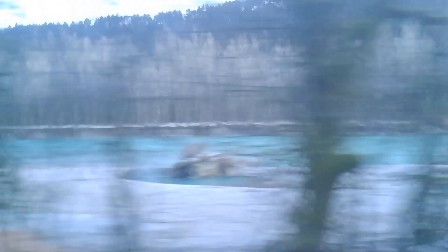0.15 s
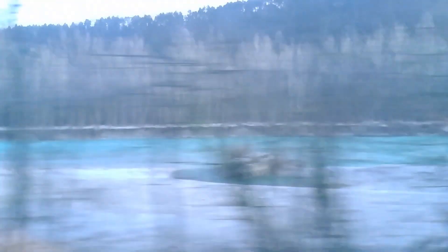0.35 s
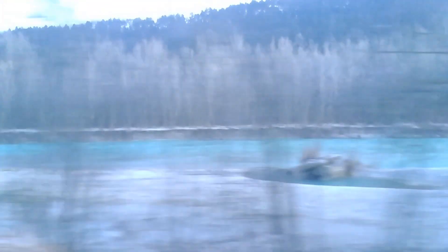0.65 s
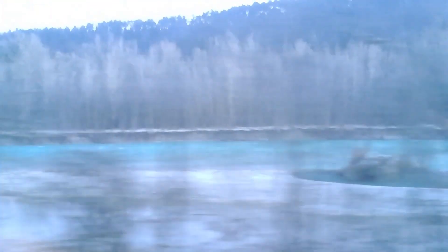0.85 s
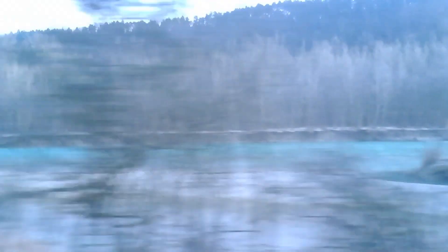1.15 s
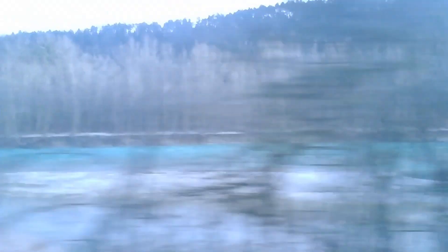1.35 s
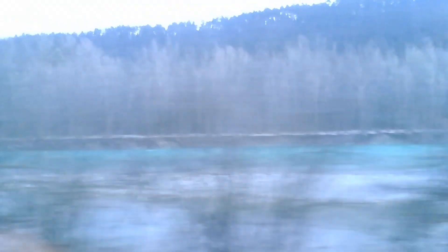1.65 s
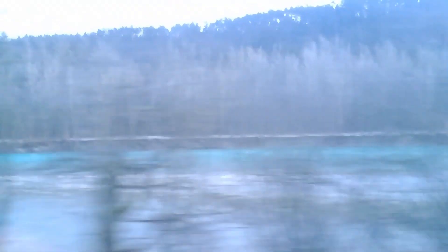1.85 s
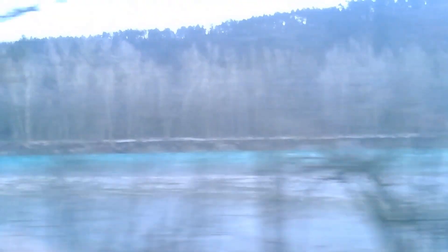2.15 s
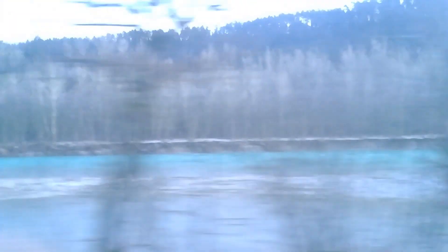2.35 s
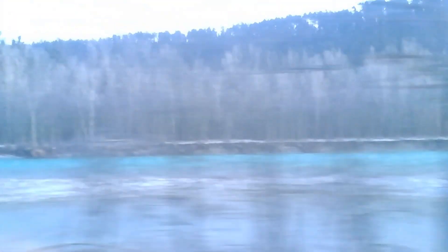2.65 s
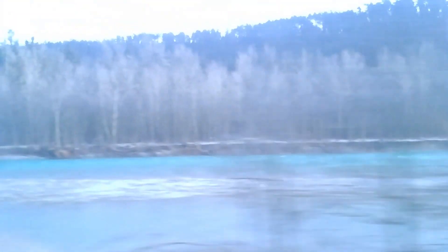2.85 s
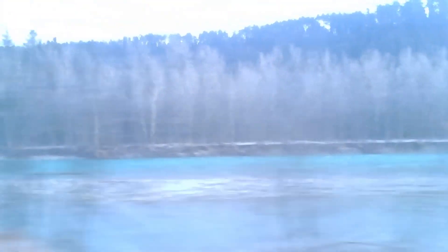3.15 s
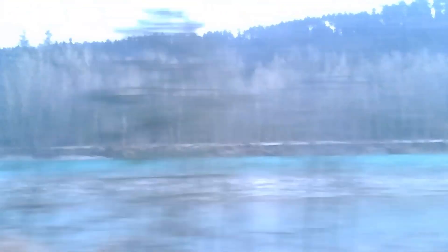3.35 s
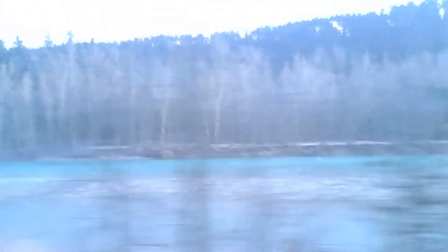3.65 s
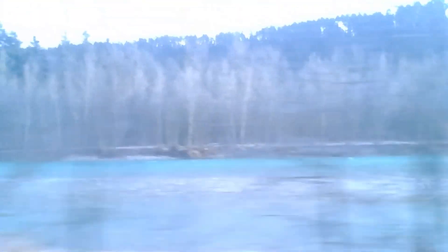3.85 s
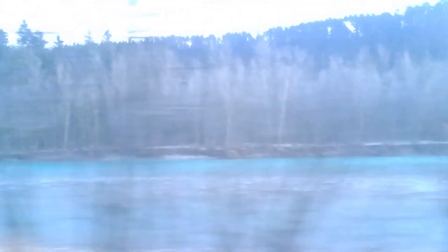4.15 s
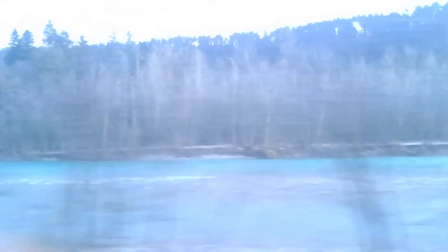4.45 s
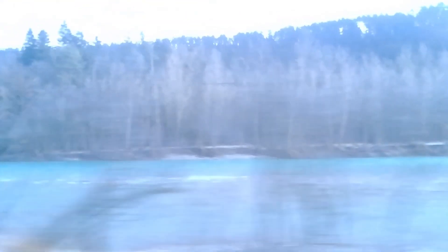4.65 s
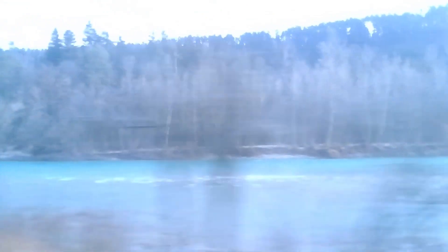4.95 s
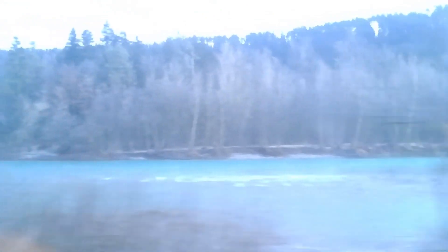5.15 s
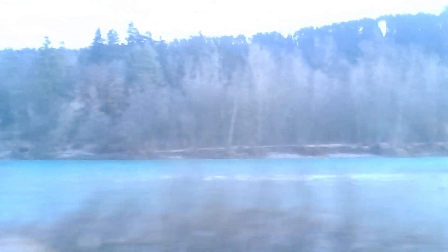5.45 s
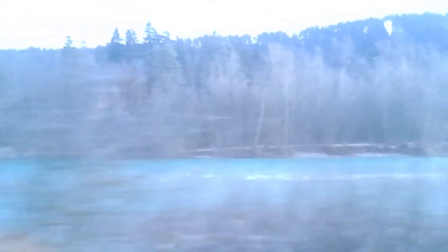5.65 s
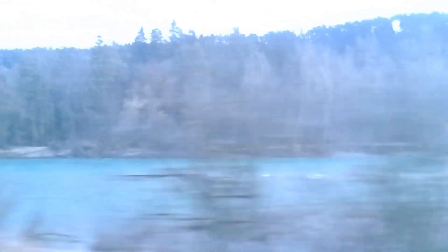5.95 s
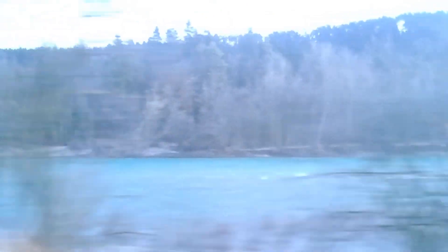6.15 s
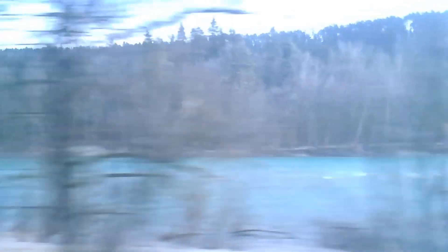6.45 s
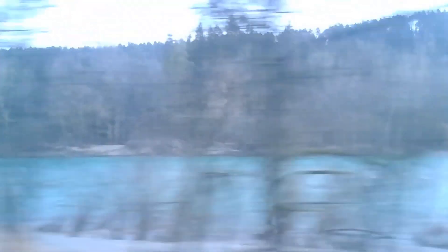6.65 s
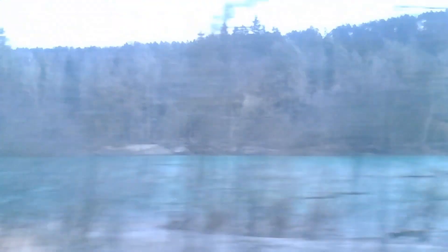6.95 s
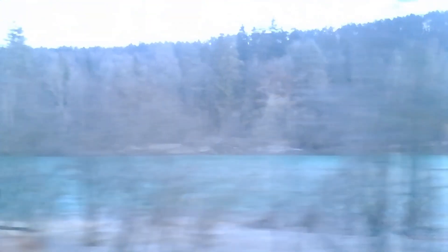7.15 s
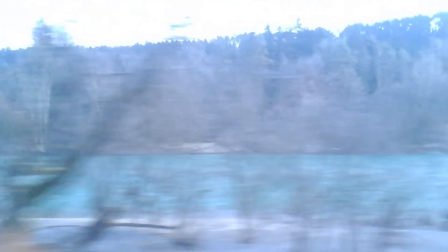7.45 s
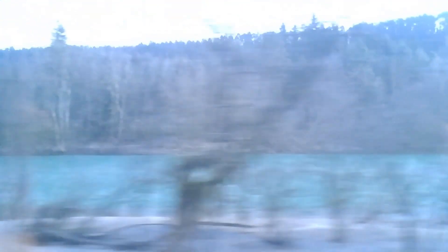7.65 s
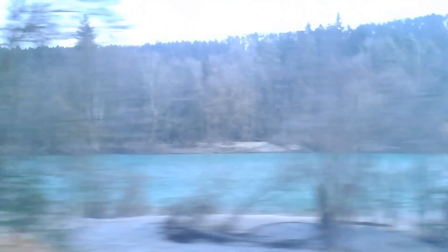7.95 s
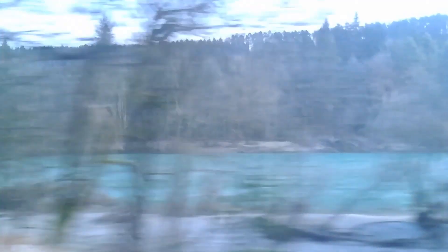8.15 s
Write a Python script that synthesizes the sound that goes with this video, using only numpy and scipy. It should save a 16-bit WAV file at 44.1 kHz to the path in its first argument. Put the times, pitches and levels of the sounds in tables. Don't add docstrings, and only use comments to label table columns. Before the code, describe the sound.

Low throbbing hum and rail rumble fill a moving railway carriage; the boom fades midway, leaving rushing roar and small rattles.

```python
import sys
import numpy as np
from scipy import signal
from scipy.fft import rfft, irfft
from scipy.io import wavfile
from scipy.ndimage import uniform_filter1d, minimum_filter1d

SR = 44100
rng = np.random.default_rng(int(sys.argv[2]) if len(sys.argv) > 2 else 0)


def inscribe(sig):
    pcm = np.round(np.clip(np.atleast_2d(sig).T, -1, 1) * 32767)
    wavfile.write(sys.argv[1], SR, pcm.astype(np.int16))


def nominal_scale(level):
    x = np.asarray(level, float) / 20
    return 10 ** x


N = 365148

# start_s, turns_per_s
AXLE_SPEED = [(0, 12.9), (.5, 13.23), (.9, 13.22), (1.1, 13.0), (1.7, 13.06), (2.1, 13.02), (2.3, 13.15),
              (2.55, 13.03), (2.9, 12.87), (3.9, 12.9), (4.5, 12.72), (5.1, 12.64), (5.5, 12.44),
              (6.3, 12.4), (7, 12.21), (7.5, 12.2), (7.9, 12.11), (8.3, 11.93)]


def rms_one(x):
    return x / np.sqrt(np.mean(x ** 2) + 1e-20)


def in_time(rows):
    s, *columns = np.transpose(rows)
    return [np.interp(np.arange(N) / SR, s, c) for c in columns]


def at_hz(points, hz):
    knots_hz, *columns = np.transpose(points)
    return [np.interp(np.log(hz), np.log(knots_hz), c) for c in columns]


def drift(rate_hz):
    step = 40
    settle = 2000
    r = np.exp(-2 * np.pi * rate_hz * step / SR)
    draws = rng.standard_normal(N // step + settle + 2)
    slow = signal.lfilter([1], [1, -2 * r, r * r], draws)[settle:]
    return np.interp(np.arange(N) / step, np.arange(len(slow)), rms_one(slow - slow.mean()))


def bell(at_s, spread_s):
    return np.exp(-.5 * ((np.arange(N) / SR - at_s) / spread_s) ** 2)


def beat(db, depth_db, period_s, loudest_s):
    return db + depth_db * np.cos(2 * np.pi * (np.arange(N) / SR - loudest_s) / period_s)


def bandpass(x, order, low_hz, high_hz):
    return signal.sosfilt(signal.butter(order, [low_hz, high_hz], "band", fs=SR, output="sos"), x)


def tone(hz):
    cycles = np.cumsum(hz * np.ones(N)) / SR + rng.random()
    return np.sqrt(2) * np.sin(2 * np.pi * cycles)


def ring(clicks, hz, t60_s):
    r = nominal_scale(-60 / (t60_s * SR))
    w = 2 * np.pi * hz / SR
    return signal.lfilter([0, np.sin(w)], [1, -2 * r * np.cos(w), r * r], clicks + 1e-18)


def struck(s, db, pan_db, modes):
    spread_db = 2.2 * rng.standard_normal((len(s), len(modes)))
    out = np.zeros((2, N))
    for k, (hz, mode_db, t60_s) in enumerate(modes):
        clicks = np.zeros((2, N))
        clicks[:, (s * SR).astype(int)] = nominal_scale(db + mode_db + spread_db[:, k] + [pan_db / 2, -pan_db / 2])
        out += ring(clicks, hz, t60_s)
    return out


def diffuse(spectrum):
    # freq_hz, likeness_0_to_1, right_lead_rad, left_minus_right_db
    ports = [(65, .99, -.18, -.5), (130, .985, -.1, 0), (170, .985, 0, 1), (220, .8, .1, -.8),
             (340, .76, 0, 1.3), (430, .52, -.1, 1.8), (600, .46, .4, -.7), (950, .28, 1.3, 0),
             (1400, .22, 2.5, -2), (2000, .1, 4.9, -.4), (2800, .15, 4.9, 3.5), (3600, .2, 9.4, 1),
             (4700, .28, 12.5, 0), (5200, .28, 15.7, 0), (7500, .05, 20, 2), (9500, .02, 20, .5),
             (12500, .02, 20, 3)]
    hz = np.arange(1, N // 2 + 2) * SR / N
    in_band = (hz > spectrum[0][0]) * (hz < spectrum[-1][0])
    gain = nominal_scale(at_hz(spectrum, hz)[0]) * in_band
    alike, lead_rad, pan_db = at_hz(ports, hz)
    alike = np.clip(alike, 0, 1)
    shared, apart = rfft(rng.standard_normal((2, N))) * gain * np.sqrt([1 + alike, 1 - alike])
    turn = nominal_scale(pan_db / 2) * np.exp(-.5j * lead_rad)
    both = irfft([(shared + apart) * turn, (shared - apart) / turn], N)
    return both / both.mean(axis=0).std()


def boom():
    # start_s, level_db
    boom_level = [(0, -13), (.2, -16.5), (.4, -17.5), (.6, -15.5), (.8, -17), (1.4, -15), (1.7, -16.5),
                  (3.8, -15.5), (4.8, -15), (5.2, -18.5), (5.4, -26.5), (5.7, -22.5), (6.3, -31),
                  (6.85, -44), (7.3, -24.5), (7.7, -29.5), (7.9, -29.5), (8.3, -23)]
    return nominal_scale(in_time(boom_level)[0]) * tone(5 * in_time(AXLE_SPEED)[0])


def wheels(recorder_db):
    # multiple, level_db, depth_db, period_s, loudest_s
    out_of_step = [(3, -47, 5.5, 3, 5), (4, -43.5, 5, 12, 1.1), (6, -45.5, 7, 6.3, 2),
                   (8, -43.5, 7, 11, 0.15), (2, -57, 9.5, 19, 1.8), (10, -48, 2, 3.1, 6.7),
                   (11, -52, 8, 3.3, 6.5)]
    # multiple, level_db
    weak_tones = [(7, -54), (9, -49.5), (12, -51), (13, -51), (14, -45.5), (15, -49.5), (22, -56),
                  (24, -54.5), (26, -58), (27, -56.5), (30, -62.5)]
    turns = in_time(AXLE_SPEED)[0]
    strong = sum(nominal_scale(beat(*swing) + 1.3 * drift(0.69)) * tone(round(k) * turns) for k, *swing in out_of_step)
    weak = sum(nominal_scale(db + 2.3 * drift(0.97)) * tone(k * turns) for k, db in weak_tones)
    return nominal_scale(recorder_db) * (strong + weak)


def machine(recorder_db):
    # pitch_hz, level_db, wander_db
    side_tones = [(43.1, -44, 3), (112.5, -56.5, 5), (183.0, -44.5, 2), (337.5, -54.5, 3)]
    hum_db = beat(-33.5, depth_db=0.1, period_s=1.9, loudest_s=2.8) + 0.84 * drift(9.9)
    hum = nominal_scale(hum_db) * tone(77.05)
    steady = sum(nominal_scale(db + wander_db * drift(1.1)) * tone(hz) for hz, db, wander_db in side_tones)
    return nominal_scale(recorder_db) * (hum + steady)


def ribs(recorder_db):
    # multiple, level_db
    rib_multiples = [(10, 2), (12, -3), (13, -1), (14, -3), (15, -4)]
    ribs_per_turn, rib_db = 3.71, -56
    per_s = ribs_per_turn * uniform_filter1d(in_time(AXLE_SPEED)[0], size=2 * SR, mode="nearest")
    fade_db = np.interp(np.arange(N) / SR, [2.0, 2.54], [0, 8.5])
    level_db = rib_db - fade_db + 0.39 * recorder_db
    out = np.zeros((2, N))
    for k, (multiple, db) in enumerate(rib_multiples):
        line = nominal_scale(level_db + db + 3.0 * drift(2.2)) * tone(multiple * per_s + 2.6 * drift(3.5))
        side = (-1) ** k
        out += line * nominal_scale([[0.41 * side], [-2.5 * side]])
    return out


def rumble(slow_db):
    # freq_hz, level_db_per_hz
    rumble_colour = [(90, -31), (115, -9.5), (135, -4), (160, -2.5), (185, -3.5), (215, -2), (245, -23),
                     (280, -39.5)]
    # crest_s, crest_db
    brief_swells = [(0.761, -37.5), (1.69, -36), (2.0, -35), (2.11, -30), (2.63, -35.5), (3.0, -42.5),
                    (3.52, -35), (3.76, -36), (4.03, -40), (4.2, -40), (4.65, -43), (5.15, -36.5), (5.3, -38),
                    (5.5, -32.5), (5.68, -34), (5.85, -42), (6.3, -41.5), (6.52, -35.5), (6.71, -30.5),
                    (6.86, -38), (7.15, -41.5), (7.28, -36), (7.41, -36), (7.67, -33.5), (7.79, -34),
                    (7.93, -35), (8.12, -37.5)]
    steady = nominal_scale(-37 + 0.39 * slow_db - 0.4 * drift(14))
    swells = sum(nominal_scale(db) * bell(s, spread_s=0.039) for s, db in brief_swells)
    return (steady + swells) * diffuse(rumble_colour)


def drone(slow_db):
    # freq_hz, level_db_per_hz
    drone_colour = [(140, -29.5), (235, -1), (252, -6), (334, -0.5), (437, -11), (620, -9.5), (709, -14),
                    (835, -19.5), (950, -23.5), (1240, -50.5), (2090, -120)]
    return nominal_scale(-41 + 0.77 * slow_db + 0.28 * drift(11)) * diffuse(drone_colour)


def sway(recorder_db):
    # freq_hz, level_db_per_hz
    sway_colour = [(16, -22.5), (35, -7), (55, -2), (70, 4.5), (80, 2.5), (90, -9.5), (115, -7), (140, -28)]
    return nominal_scale(-35 + recorder_db) * diffuse(sway_colour)


def roar(load_db):
    # freq_hz, level_db_per_hz
    roar_colour = [(600, -28.5), (900, -3), (1030, -4), (1160, -2), (1510, -8), (2020, -4), (2400, -8.5),
                   (2730, -10.5), (3050, -16), (3350, -24), (3900, -40.5)]
    once_a_turn = tone(in_time(AXLE_SPEED)[0])
    flicker_db = 0.66 * drift(1.5) + 0.97 * drift(40) + 0.18 * once_a_turn
    return nominal_scale(load_db + flicker_db) * diffuse(roar_colour)


def rush(slow_db):
    # freq_hz, level_db_per_hz
    rush_colour = [(2900, -32), (3300, -0.5), (3600, -4.5), (3900, -1), (4300, -1), (4700, -4),
                   (5200, -7.5), (5800, -7.5), (6500, -10.5), (7200, -15.5), (8000, -19), (9000, -24.5),
                   (11000, -43)]
    return nominal_scale(-71.5 + 0.72 * slow_db + 0.55 + 1.5 * drift(35)) * diffuse(rush_colour)


def hiss(recorder_db):
    # freq_hz, level_db_per_hz
    hiss_colour = [(6000, -9), (8000, -4), (10000, -4), (12200, 0), (14000, -1), (16500, -1)]
    return nominal_scale(-90 + .4 * recorder_db) * diffuse(hiss_colour)


def whistle():
    closes_s, closing_db_per_s = 3.3, 27.5
    hz = 6300 + 620 * bell(2.05, 1.1)
    closing_db = closing_db_per_s * np.maximum(np.arange(N) / SR - closes_s, 0)
    last_gasp_db = 9 * bell(closes_s, .022)
    db = -81.5 - 5 * bell(1.7, .55) - closing_db + last_gasp_db
    return [nominal_scale(db - 1.5 + 3.5 * drift(18)) * tone(hz + 45 * drift(90)) for side in "LR"]


def rubs():
    # start_s, level_db, t60_s
    rub_events = [(0.821, -74.5, 0.41), (.9, -67.5, 0.23), (1.311, -63.5, 0.65), (1.431, -70.5, 0.73),
                  (2.169, -68, 0.32), (2.301, -64, 0.44), (2.381, -72, 0.23), (2.42, -69, 0.29),
                  (2.7, -69.5, 0.81), (3.293, -61, .4), (6.022, -65.5, 0.45), (6.6, -65, 0.23),
                  (6.918, -65, 0.5), (7.072, -66.5, .2), (7.178, -62.5, 0.34), (7.312, -56, 0.36),
                  (7.4, -63.5, .4), (7.58, -66, 0.28), (7.673, -62.5, 0.5)]
    # freq_hz, level_db_per_hz
    rub_colour = [(1900, -25), (2500, -1), (3500, 0), (4400, 1), (5500, -7), (7000, -12), (8800, -17),
                  (10000, -32), (14000, -36), (16000, -46)]
    attack_s = 0.0036
    t = np.arange(N) / SR
    strength = np.zeros(N)
    for s, db, t60_s in rub_events:
        age_s = t[round(s * SR):] - s
        strength[-len(age_s):] += nominal_scale(db - 60 * age_s / t60_s) * np.clip(age_s / attack_s, 0, 1)
    return strength * nominal_scale(1.6 * drift(70)) * diffuse(rub_colour)


def pings():
    # start_s, peak_db, pitch_hz, left_minus_right_db
    panel_pings = [(1.321, -70, 7640, 1.5), (7.181, -58.5, 4300, 1.5), (7.196, -62, 4950, 2),
                   (7.291, -61, 5250, 6), (7.291, -60, 4250, 6), (7.315, -66, 6950, 3),
                   (7.317, -66, 7850, 2)]
    out = np.zeros((2, N))
    click = np.zeros(3000)
    click[0] = 1
    for s, db, hz, pan_db in panel_pings:
        at = round(s * SR)
        level = nominal_scale(db + np.array([[pan_db], [-pan_db]]) / 2)
        out[:, at:at + len(click)] += level * ring(click, hz, t60_s=0.025)
    return out


def clinks():
    # start_s, peak_db
    clink_events = [(1.33, -72.5), (3.296, -69), (3.303, -65), (3.309, -60.5), (3.316, -63), (3.323, -63),
                    (3.329, -66), (3.339, -66), (3.348, -65), (3.356, -66.5), (6.033, -67.5), (6.047, -67),
                    (6.93, -66.5), (7.32, -66), (7.42, -64)]
    # pitch_hz, level_db, t60_s
    fitting_modes = [(2520, 3, .12), (2750, 1, .1), (3050, -1, .1), (3424, -2, .2), (3540, -3, .1),
                     (3661, -1, .3), (3887, -6, .25), (4135, 1, .06), (4350, -3, .05), (4650, -4, .04),
                     (5730, -12, .06), (6350, -9, .06)]
    s, db = np.transpose(clink_events)
    return bandpass(struck(s, db - 3.5, np.full(len(s), 1.5), fitting_modes), 3, 2200, 6900)


def bumps():
    # start_s, peak_db, pitch_hz
    rail_bumps = [(1.979, -30, 210), (2.027, -26, 164), (2.082, -20.5, 183), (2.111, -11, 181.4),
                  (4.463, -22, 177), (6.644, -16.5, 192), (6.673, -11, 167), (7.16, -16, 183),
                  (7.675, -19, 176), (7.992, -17.5, 198), (8.198, -14, 186)]
    out = np.zeros(N)
    for s, db, hz in rail_bumps:
        push = np.zeros(N)
        push[round(s * SR)] = nominal_scale(db - 5.5)
        out += ring(push, hz, t60_s=0.17)
    return bandpass(out, 2, 110, 300)


def ticks():
    # start_s, peak_db, left_minus_right_db
    trim_ticks = [(3.1857, -56, 6), (7.0753, -67, 1), (7.197, -62, 2), (7.292, -50, 10)]
    # pitch_hz, level_db, t60_s
    trim_modes = [(4400, -16, .01), (4950, -3, 0.012), (6130, -5, 0.01), (5550, -7, .008),
                  (6600, -10, .008), (9200, -30, .004)]
    s, db, pan_db = np.transpose(trim_ticks)
    return bandpass(struck(s, db + 2.0, pan_db, trim_modes), 3, 4200, 7800)


def scene():
    # start_s, level_db
    wheel_load = [(0, -56.5), (.35, -58.5), (1.2, -60), (1.4, -57), (1.65, -57.5), (2.93, -59),
                  (3.07, -55.5), (3.37, -56), (3.6, -59), (4.2, -60), (4.24, -55.5), (4.44, -56.5),
                  (4.47, -58.5), (4.97, -60.5), (5.12, -56), (5.65, -58.5), (7.1, -52), (8.28, -51.5)]
    load_db = in_time(wheel_load)[0]
    slow_db = uniform_filter1d(load_db, size=SR, mode="nearest") - load_db.mean()
    recorder_db = np.interp(np.arange(N) / SR, [5.8, 6.5], [0, 5.5])
    floor = boom() + wheels(recorder_db) + machine(recorder_db) + bumps()
    right_lag = 19
    late = np.r_[np.full(right_lag, floor[0]), floor[:-right_lag]]
    below = np.array([nominal_scale(0.97) * floor, nominal_scale(1.43) * late])
    rolling = rumble(slow_db) + drone(slow_db) + sway(recorder_db) + roar(load_db) + rush(slow_db)
    air = hiss(recorder_db) + whistle()
    trim = rubs() + pings() + clinks() + ticks()
    return below + ribs(recorder_db) + rolling + air + trim


def treble_sags(dry):
    # start_s, depth_db
    deep_sags = [(0.348, 5.5), (0.371, 4.6), (0.395, 8), (0.535, 4.9), (0.581, 5.1), (0.673, 7.5),
                 (0.697, 4), (0.743, 6), (1.001, 8.5), (1.068, 10), (1.161, 4.5), (1.554, 5.5), (1.581, 6),
                 (2.065, 4.5), (2.184, 4), (2.508, 5), (2.58, 5), (2.624, 8), (2.648, 3), (2.785, 6),
                 (2.833, 5.6), (2.879, 4), (2.903, 7.5), (2.924, 6.2), (3.137, 5), (3.366, 11.5),
                 (3.506, 10.5), (3.648, 8), (3.716, 4), (3.762, 8.5), (3.856, 3.5), (3.949, 7.5),
                 (4.041, 6.5), (4.089, 5), (4.202, 7.5), (4.227, 11), (4.343, 4.9), (4.46, 8), (4.482, 6.5),
                 (4.552, 6), (4.575, 5.5), (4.717, 8), (4.739, 1.5), (4.829, 5), (4.948, 8), (4.993, 6),
                 (5.292, 3.5), (5.479, 5), (6.157, 4), (6.669, 2), (6.714, 3), (6.891, 4), (7.232, 5),
                 (7.495, 7), (7.826, 5)]
    sag_edges_hz = [1500, 3000, 4800, 7000]
    frame, width = 1024, 250
    joints = N // frame + 1
    s, db = np.transpose(deep_sags)
    deep_at = np.round(s * SR / frame).astype(int)
    above = [signal.sosfiltfilt(signal.butter(2, hz, "high", fs=SR, output="sos"), dry) for hz in sag_edges_hz]
    above.append(0)
    out = dry - above[0]
    for wide, narrow in zip(above, above[1:]):
        joint_db = 3.2 * rng.exponential(1, joints) / 2
        joint_db[deep_at] = 1.5 * db * (1 + .9 * rng.uniform(-0.61, 1, len(s)))
        depth_db = np.zeros(N)
        depth_db[::frame] = joint_db
        depth_db = width * uniform_filter1d(uniform_filter1d(depth_db, size=width), size=width)
        out = out + nominal_scale(-depth_db) * (wide - narrow)
    return out


def low_pass(x):
    return signal.sosfilt(signal.butter(12, 15719, fs=SR, output="sos"), x)


def record(dry):
    ceiling = .4
    room_left = np.minimum(1, ceiling / (np.abs(dry).max(axis=0) + 1e-9))
    held = minimum_filter1d(room_left, size=1800)
    gain = uniform_filter1d(uniform_filter1d(held, size=900), size=900)
    return low_pass(gain * treble_sags(dry))


dry = scene()
out = record(dry)
inscribe(out)
```